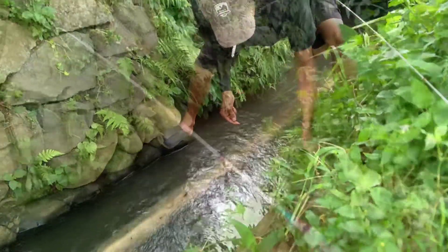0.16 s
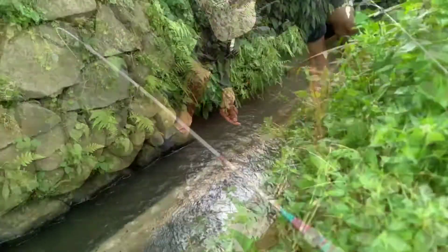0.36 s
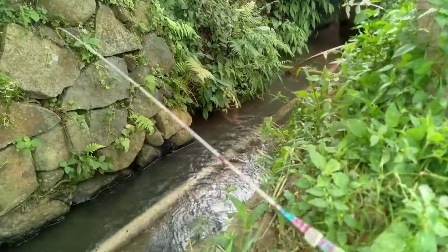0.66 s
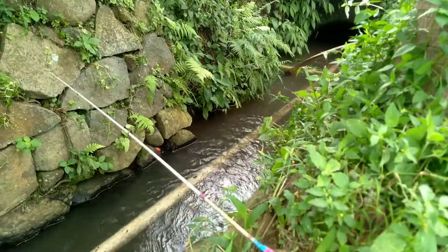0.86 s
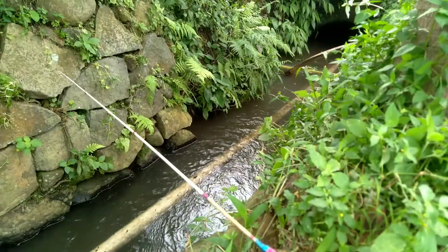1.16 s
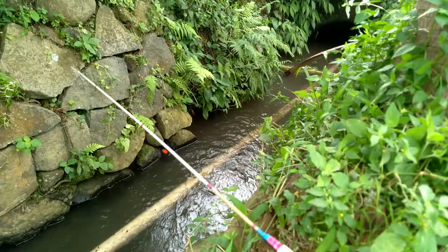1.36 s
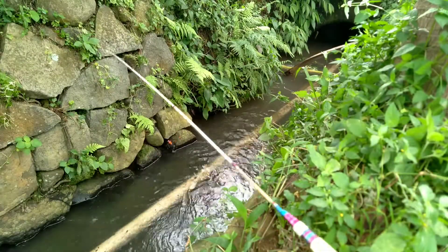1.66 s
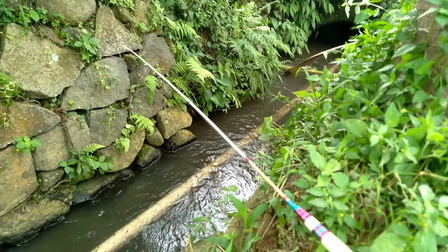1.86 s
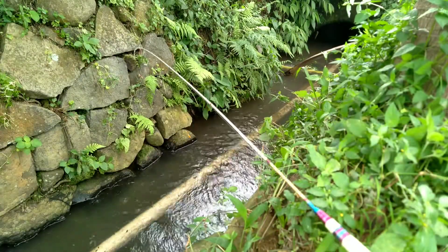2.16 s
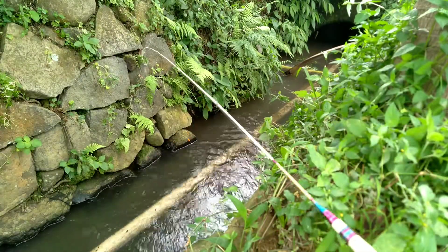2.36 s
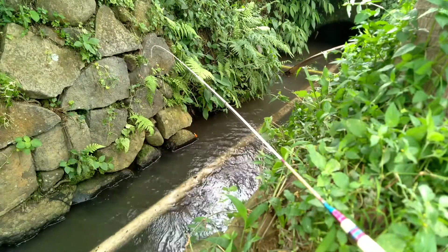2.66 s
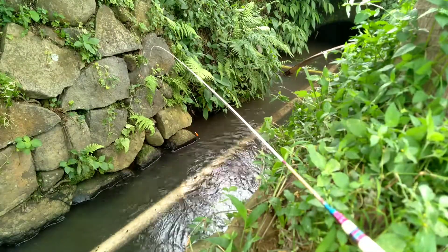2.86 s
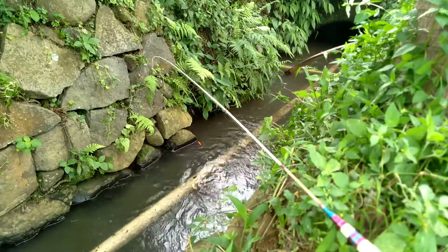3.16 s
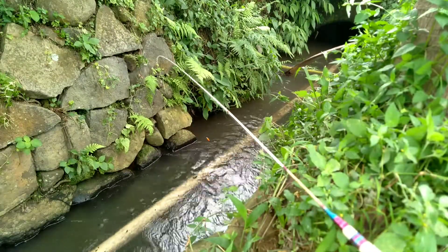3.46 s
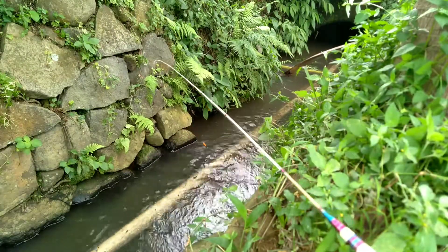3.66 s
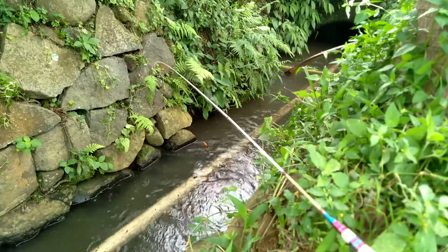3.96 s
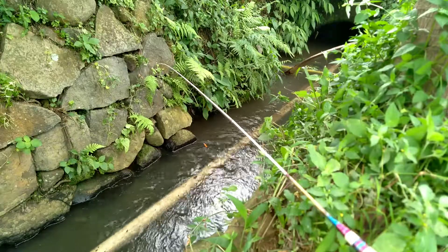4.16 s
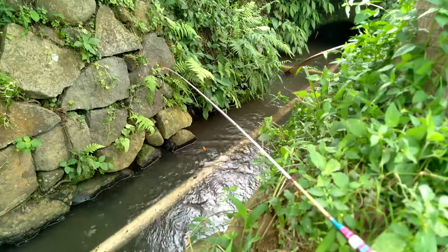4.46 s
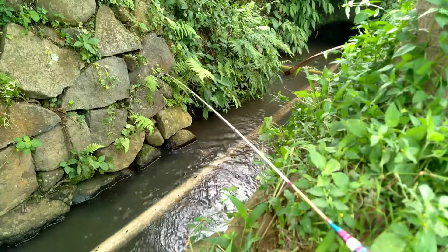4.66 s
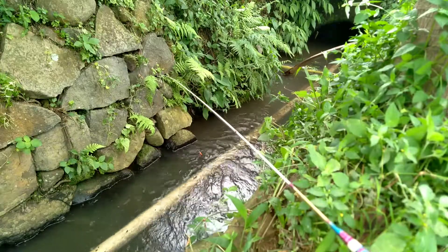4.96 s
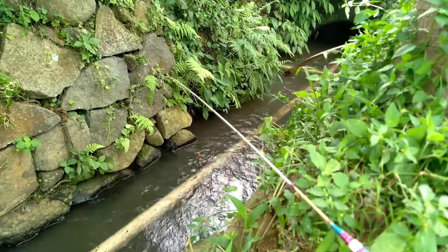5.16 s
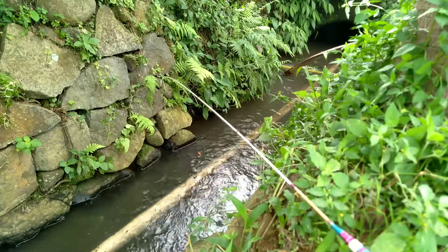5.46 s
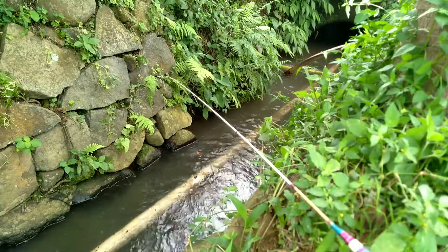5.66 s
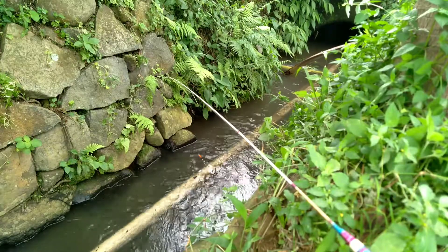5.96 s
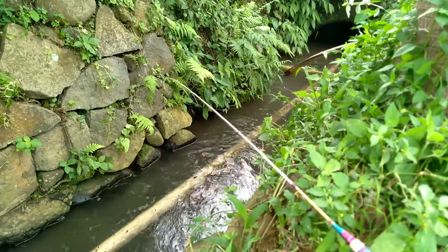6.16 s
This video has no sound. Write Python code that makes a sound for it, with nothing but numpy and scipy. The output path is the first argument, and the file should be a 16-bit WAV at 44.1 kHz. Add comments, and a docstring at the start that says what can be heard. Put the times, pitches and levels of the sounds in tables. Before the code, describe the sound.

A shrill, steady insect chorus fades in outdoors with a thin, very high electrical whine. Beneath it, water runs through a stone-walled ditch with a low rumble, a soft wash and occasional bubbles. After about a second, a fishing rod is knocked several times close to the microphone, thudding and rattling. Later come a few soft handling bumps and faint bird chirps, while motors hum far away.

```python
"""Insects by a stone-walled ditch

Insects click their tymbals into a shrill chorus over a thin electrical whine. A fishing rod, knocked
close by, thuds and rattles. Water slides through the ditch: culvert rumble, soft wash, bubbles, drips.
Small birds chirp, something ticks in the weeds, motors drone far off. All fades in over about a second."""
import sys
import numpy as np
from scipy import signal
from scipy.fft import rfft, irfft, next_fast_len
from scipy.io import wavfile
from scipy.ndimage import map_coordinates

SR = 44100
rng = np.random.default_rng(int(sys.argv[2]) if len(sys.argv) > 2 else 0)


def log_audio(samples):
    """Write samples as a 16-bit WAV file to the path given in sys.argv[1]."""
    # one column per channel
    frames = np.atleast_2d(samples).T
    # limit to full scale, then quantise
    limited = np.clip(frames, -1, 1)
    pcm = np.round(limited * 32767).astype(np.int16)
    wavfile.write(sys.argv[1], SR, pcm)


N = 278287

CHORUS_CONTOUR = [(1.0, -41.5), (1.21, -42), (3.93, -41), (4.45, -43.5), (4.53, -40.5), (6.31, -40.5)]  # time_s, relative_db
CHORUS_CRESTS = [-.3, .98, 2.28, 3.62, 4.93, 6.12, 7.4]  # slow wave peaks: time_s
CHORUS_SPECTRUM = [(7800, -78), (8500, -36), (8700, -22.5), (8850, -6.5), (9000, -3.5), (9280, 1),
                   (9550, -2.5), (9750, -8), (9900, -30), (10150, -43.5), (10500, -102)]  # freq_hz, relative_db
CHORUS_EDGE_SPECTRUM = [(9200, -56.5), (9600, 9.5), (9780, 6), (10000, -10), (10150, -22), (10330, -46.5),
                        (10500, -92)]  # freq_hz, relative_db
WHINE_SPECTRUM = [(11350, -80), (11480, -19.5), (11560, -1.5), (11620, 0), (11850, 1.5), (11910, -14),
                  (11990, -23), (12100, -71)]  # freq_hz, relative_db

# node_hz: lowest pitch with a node at the struck spot
ROD_KNOCKS = [(1.127, -27.5, 1430, -38, 1960), (1.149, -35.5, 1210, -39.5, 2020),
              (1.243, -22.5, 3000, -36.5, 1700), (1.332, -43, 790, -37.5, 1152),
              (1.392, -39, 610, -53.5, 1150)]  # start_s, thud_gain_db, cutoff_hz, rattle_gain_db, node_hz
GRIP_SPECTRUM = [(80, -13.5), (230, 3), (420, 4.5), (600, 6), (750, 3.5), (950, -11.5), (1300, -7.5),
                 (1600, -14), (2000, -11), (2600, -8.5), (3100, -35), (4200, -14), (5300, -19),
                 (11000, -50)]  # freq_hz, relative_db
TUBE_MODES = [(1295, -6.5, 0.083), (1900, -5, 0.18), (3420, -5, 0.15), (3830, -5, 0.13),
              (4400, -13.5, 0.15), (4960, -12, 0.19), (6240, -3, 0.17), (6520, -4.5, 0.24),
              (7110, -8, 0.43), (7900, -7, 0.17), (8430, -0.5, 0.18)]  # hollow rod: freq_hz, relative_db, t60_s
HAND_BUMPS = [(3.078, 280, -50.5), (3.241, 55, -40.5), (3.35, 72.4, -37), (4.28, 67, -34.5),
              (4.325, 84.5, -32)]  # start_s, pitch_hz, level_db

CULVERT_SPECTRUM = [(20, -21), (35, -22.5), (58, -8.5), (80, -1), (110, -0.5), (135, -0.5), (160, -7),
                    (200, -12), (270, -31.5), (350, -47), (450, -52.5), (900, -73)]  # freq_hz, relative_db
CHURN_CONTOUR = [(0, -58.5), (.8, -61), (1.7, -66), (6.31, -68)]  # hollow churning under the bank: time_s, level_db
CHURN_SPECTRUM = [(150, -22), (190, 4), (230, 3), (275, -1), (330, -13.5), (390, -22), (480, -31),
                  (800, -63)]  # freq_hz, relative_db
WASH_SPECTRUM = [(100, -6), (400, 2.5), (700, 1.5), (1200, 0.5), (2500, -3.5), (5000, -5), (6500, -4),
                 (8200, 1), (9500, 4.5), (10500, -45)]  # freq_hz, relative_db
CLEAR_BUBBLES = [(.02, 490, -50), (1.695, 575, -59.5), (1.712, 1899, -62.5), (2.39, 462, -65),
                 (3.612, 903, -57.5), (5.105, 868, -61.5), (5.43, 566, -70), (5.63, 835, -55.5),
                 (5.73, 850, -63), (6.1, 1123, -56), (6.113, 816, -61)]  # start_s, pitch_hz, level_db

# bird peeps and two high bubble blips (at 5.165 s and 5.572 s)
PEEPS_AND_BLIPS = [(1.82, .013, 6000, -66), (1.87, 0.014, 3600, -69.5), (3.515, 0.017, 5630, -68),
                   (3.56, 0.046, 6310, -67.5), (3.715, 0.017, 5120, -72), (3.995, 0.032, 7940, -55),
                   (4.05, 0.06, 8030, -57), (4.082, 0.016, 4550, -50.5), (4.24, 0.042, 8000, -62),
                   (4.35, .031, 8000, -57), (4.58, .013, 3860, -65), (4.748, .02, 8450, -58),
                   (4.868, 0.013, 6280, -63), (4.885, 0.033, 7130, -56.5), (4.93, 0.05, 7150, -56.5),
                   (5.165, 0.041, 2310, -67), (5.572, 0.033, 2070, -69), (5.765, 0.027, 3910, -69.5),
                   (6.255, 0.054, 3520, -66.5)]  # start_s, length_s, onset_hz, relative_db
BIRD_SLURS = [(4.43, 0.084, 7050, -55), (4.468, .055, 6120, -48), (5.745, 0.023, 3000, -56.5),
              (6.145, .09, 7700, -50.5), (6.18, 0.043, 6425, -44.5), (6.215, 0.11, 6340, -47.5)]  # falling notes: start_s, length_s, onset_hz, relative_db
WEED_TICKS = [(.337, -43.5)]  # start_s, level_db
TICK_SPECTRUM = [(6000, -35), (7700, 2), (8500, -12), (10200, 8), (11500, -32), (12900, -4), (13800, -10),
                 (14700, 3)]  # freq_hz, relative_db
MOTOR_SWELLS = [(0.757, 0.93, 110.7, -52.5), (1.24, 0.57, 123.5, -49.5), (2.197, 0.96, 124, -52.5),
                (3.846, 0.74, 134.5, -53), (5, 1.7, 98.5, -51.5)]  # start_s, length_s, pitch_hz, level_db
BANK_DECAY = [(200, 0.31), (2000, 0.19), (8000, 0.33)]  # echo off the banks: freq_hz, t60_s


def insects(trim_db=-0.87, edge_db=-6, wave_depth_db=12, bend_hz=42):
    """Steady chorus; each slow wave bends it upward and brightens its edge."""
    wave_cycles = np.interp(np.arange(N) / SR, CHORUS_CRESTS, np.arange(len(CHORUS_CRESTS)))
    effort = np.cos(2 * np.pi * wave_cycles)
    edge_gain = amp(edge_db + wave_depth_db * (effort - 1) / 2 + 1.3 * wobble(11))
    edge = edge_gain * tymbals(CHORUS_EDGE_SPECTRUM, clicks_per_s=7400)
    chorus = tymbals(CHORUS_SPECTRUM, clicks_per_s=9000) + edge
    analytic = signal.hilbert(chorus, next_fast_len(N))[:N]
    shift_hz = bend_hz * (effort + 0.49 * wobble(6))
    bent = np.real(analytic * np.exp(2j * np.pi * np.cumsum(shift_hz) / SR))
    return amp(contour(CHORUS_CONTOUR) + trim_db) * bent


def tymbals(spectrum, clicks_per_s):
    """Clicks of many insects overlap in one shrill resonance."""
    clicks = (rng.random(N) < clicks_per_s / SR) * rng.standard_normal(N)
    return coloured(clicks, spectrum)


def whine(pitch_hz=11743.6, buzz_hz=59.85, level_db=-41, flutter=0.06):
    """Thin electrical tone, restarting every buzz cycle."""
    since_restart_s = np.arange(N) / SR % (1 / buzz_hz)
    tone = np.sin(2 * np.pi * pitch_hz * since_restart_s) * (1 + flutter * wobble(500))
    return amp(level_db) * coloured(tone, WHINE_SPECTRUM)


def rod(rattle_rate_hz=260, rattle_t60_s=0.034, bump_t60_s=0.15):
    """Knocks thud in the grip and rattle the tube's loose joints; the hand adds soft bumps."""
    out, t = np.zeros(N), np.arange(SR // 4) / SR
    for start_s, thud_db, cutoff_hz, rattle_db, node_hz in ROD_KNOCKS:
        thud = signal.lfilter(*signal.butter(2, cutoff_hz, fs=SR), struck(GRIP_SPECTRUM))
        add(out, start_s, echoed(amp(thud_db) * thud, wet_db=-3.5))
        for hz, mode_db, t60_s in TUBE_MODES:
            coupling = abs(np.sin(np.pi * hz / node_hz))  # zero when struck at a node
            jitter = map_coordinates(rng.standard_normal(256), [t * rattle_rate_hz], mode="wrap")
            mode = coupling * np.sin(2 * np.pi * hz * t + 0.93 * jitter)
            decay = amp(-60 * t / t60_s) + 1.46 * amp(-60 * t / rattle_t60_s)
            attack = 1 - np.exp(-t / 0.00066)
            add(out, start_s, amp(rattle_db + mode_db - 12) * attack * decay * mode)
    bump_envelope = amp(-60 * t / bump_t60_s) * (1 - np.exp(-t / 0.0049))
    for start_s, hz, level_db in HAND_BUMPS:
        add(out, start_s, amp(level_db) * bump_envelope * np.sin(2 * np.pi * hz * t))
    return out


def water(rumble_db=-50.5, wash_db=-73.5, tiny_count=420):
    """The culvert rumbles, the flow churns, the surface hisses; many tiny bubbles, a few clear ones."""
    rumble = amp(rumble_db - 0.53 * wobble(2) + 0.65 * wobble(9)) * noise(CULVERT_SPECTRUM)
    churn = amp(contour(CHURN_CONTOUR) + wobble(2.92) + 3.33 * wobble(20)) * noise(CHURN_SPECTRUM)
    wash = amp(wash_db + 0.5 * wobble(15)) * noise(WASH_SPECTRUM)
    tiny, clear = np.zeros(N), np.zeros(N)
    for when, height, strength in rng.random((tiny_count, 3)):
        pop = bubble(hz=350 * 13 ** height, cycles=20, rise=0.15)
        add(tiny, when * N / SR, amp(-82.5 + 8.1 * strength ** 3) * pop)
    for start_s, hz, level_db in CLEAR_BUBBLES:
        add(clear, start_s, echoed(amp(level_db) * bubble(hz, cycles=40, rise=0.088), wet_db=-1))
    return rumble + churn + wash + echoed(tiny, wet_db=-2)[:N] + clear


def bubble(hz, cycles, rise):
    """An air pocket rings, rising in pitch as it nears the surface."""
    progress = np.arange(int(cycles * SR / hz)) * hz / SR / cycles
    envelope = amp(-40 * progress) * (1 - np.exp(-12 * progress))
    return envelope * np.sin(2 * np.pi * cycles * progress * (1 + rise * progress / 2))


def chirps(notes, fall_hz_per_s, rasp_hz, wet_db):
    """Bird whistles or bubble blips: tones that swell and fall in pitch, smeared by distance."""
    out = np.zeros(N)
    for start_s, length_s, onset_hz, relative_db in notes:
        t = np.arange(int(length_s * SR)) / SR
        waver = map_coordinates(rng.standard_normal(128), [t * 600], mode="wrap")
        phase = 2 * np.pi * np.cumsum(onset_hz - fall_hz_per_s * t + rasp_hz * waver) / SR
        envelope = amp(relative_db - 3) * np.sin(np.pi * t / length_s)
        add(out, start_s, echoed(envelope * np.sin(phase), wet_db))
    return out


def ticks(attack_s=0.002, t60_s=0.05):
    """Dry, very high tick in the weeds."""
    out, t = np.zeros(N), np.arange(SR // 8) / SR
    envelope = amp(-60 * t / t60_s) * (1 - np.exp(-t / attack_s))
    for start_s, level_db in WEED_TICKS:
        add(out, start_s, amp(level_db) * envelope * noise(TICK_SPECTRUM)[:len(t)])
    return out


def motors():
    """One far motor hums throughout; others swell and fade."""
    out, t = firing_tone(hz=113.66, level_db=-56), np.arange(N) / SR
    for start_s, length_s, hz, level_db in MOTOR_SWELLS:
        swell = np.sin(np.pi * np.clip((t - start_s) / length_s, 0, 1))
        out += swell * firing_tone(hz, level_db)
    return out


def firing_tone(hz, level_db, waver_hz=1.214, waver_db=1.5):
    """Only a motor's lowest firing tone carries, wavering on the way."""
    phase = 2 * np.pi * np.cumsum(hz + waver_hz * wobble(8.5)) / SR
    return amp(level_db + waver_db * wobble(7.8)) * unit(np.sin(phase))


def drips(count=10, level_db=-71, low_hz=2800, high_hz=5800):
    """Faint, high drips at random along the wall."""
    out = np.zeros(N)
    for when, height, softness in rng.random((count, 3)):
        plink = bubble(low_hz * (high_hz / low_hz) ** height, cycles=104, rise=0.05)
        add(out, when * N / SR, amp(level_db - 2.7 * softness) * plink)
    return echoed(out, wet_db=1)[:N]


def echoed(x, wet_db):
    """x plus its scatter off stone banks and leaves."""
    hz, t, bands = signal.stft(rng.standard_normal(SR // 3), SR, nperseg=256)
    decay = amp(-60 * t / along(BANK_DECAY, hz)[:, None])
    response = signal.istft(bands * decay, SR, nperseg=256)[1]
    response = np.pad(response, (SR // 300, 0))
    response *= amp(wet_db) / np.linalg.norm(response)
    response[0] = 1  # direct path
    return signal.fftconvolve(x, response)


def struck(spectrum, size=4096):
    """Minimum-phase impulse response, peak 1."""
    gain = amp(along(spectrum, np.fft.rfftfreq(size, 1 / SR)))
    cepstrum = irfft(np.log(gain))
    cepstrum[1:size // 2] *= 2
    cepstrum[size // 2 + 1:] = 0
    pulse = irfft(np.exp(rfft(cepstrum)))
    return pulse / np.abs(pulse).max()


def noise(spectrum):
    """Shaped noise, rms 1."""
    return coloured(rng.standard_normal(N), spectrum)


def coloured(x, spectrum):
    """x through a spectrum, rms 1."""
    return unit(filtered(x, lambda hz: amp(along(spectrum, hz))))


def filtered(x, response):
    """x through a gain by frequency."""
    size = next_fast_len(N + SR // 2)
    return irfft(rfft(x, size) * response(np.fft.rfftfreq(size, 1 / SR)), size)[:N]


def along(points, hz):
    """Table lookup on a log frequency axis."""
    freqs_hz, values = np.transpose(points)
    return np.interp(np.log(hz + 1), np.log(freqs_hz + 1), values)


def contour(points):
    """Time table to one value per sample."""
    return np.interp(np.arange(N) / SR, *np.transpose(points))


def wobble(knots_per_s):
    """Smooth random curve."""
    knots = rng.standard_normal(int(N * knots_per_s / SR) + 4)
    return map_coordinates(knots, [np.arange(N) * knots_per_s / SR])


def add(track, start_s, sound):
    """Mix in place."""
    part = track[max(round(start_s * SR), 0):][:len(sound)]
    part += sound[:len(part)]


def amp(db):
    """Decibels to gain."""
    return 10 ** (np.asarray(db) / 20)


def unit(x):
    """Scale to rms 1."""
    return x / np.sqrt(np.mean(x ** 2) + 1e-20)


def scene(start_gain=0.19, fade_s=0.93):
    """Mono mix from the bank, fading in."""
    peeps_and_blips = chirps(PEEPS_AND_BLIPS, fall_hz_per_s=1100, rasp_hz=30, wet_db=-1)
    slurs = chirps(BIRD_SLURS, fall_hz_per_s=10500, rasp_hz=80.5, wet_db=3)
    mix = water() + drips() + insects() + whine() + motors() + rod() + ticks() + peeps_and_blips + slurs
    fade = np.interp(np.arange(N) / SR, [0, fade_s], [start_gain, 1])
    return (fade * mix)[None]


def record(dry, cutoff_hz=15000):
    """Brick-wall low-pass."""
    return filtered(dry[0], lambda hz: hz < cutoff_hz)[None]


dry = scene()
out = record(dry)
log_audio(out)
```